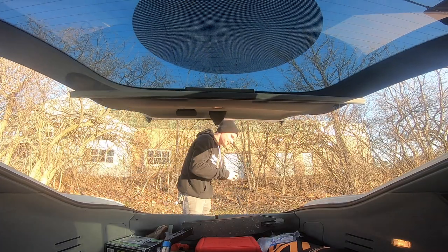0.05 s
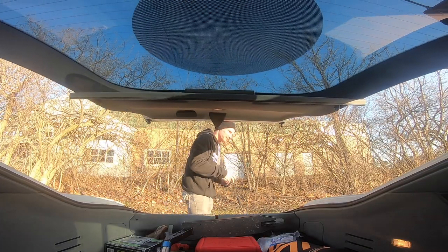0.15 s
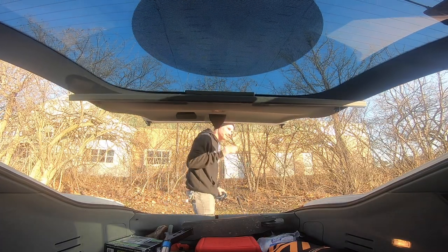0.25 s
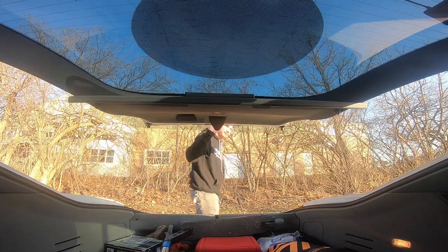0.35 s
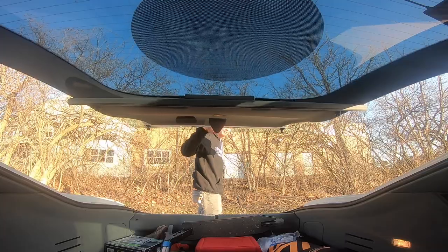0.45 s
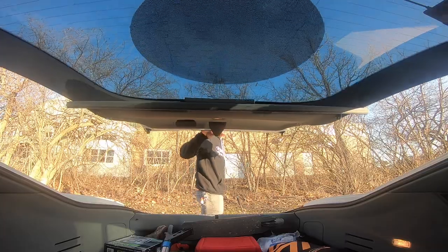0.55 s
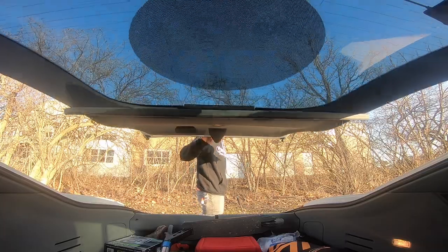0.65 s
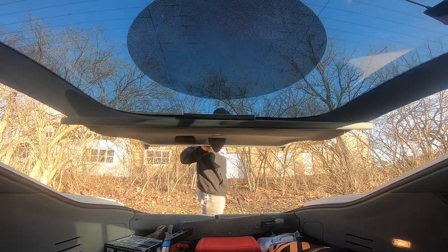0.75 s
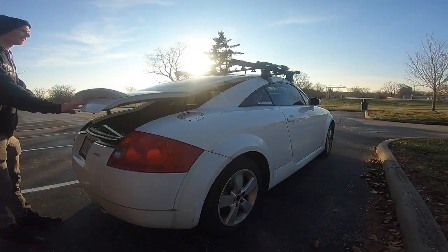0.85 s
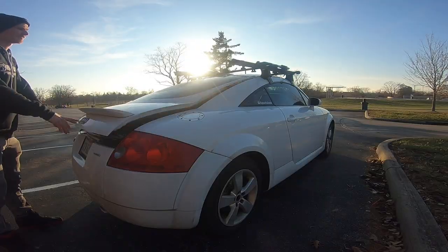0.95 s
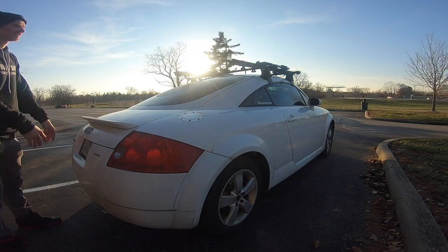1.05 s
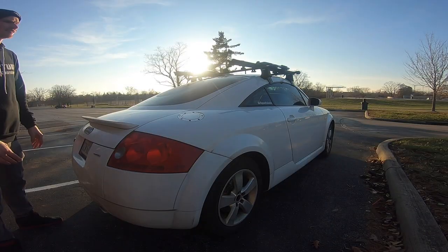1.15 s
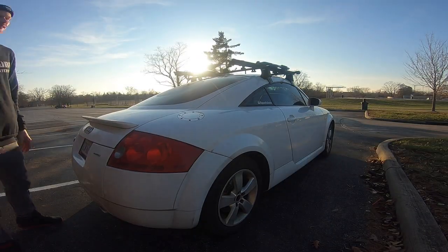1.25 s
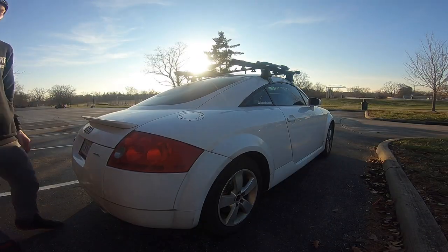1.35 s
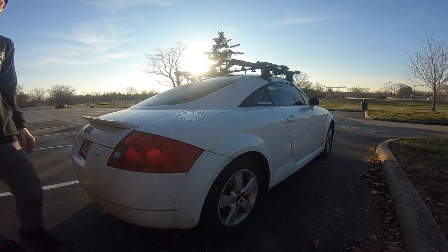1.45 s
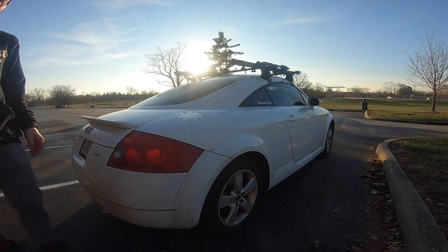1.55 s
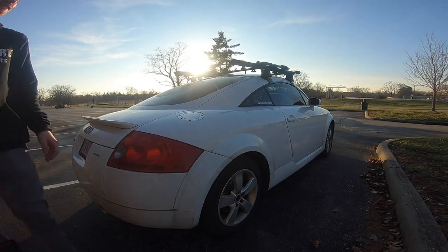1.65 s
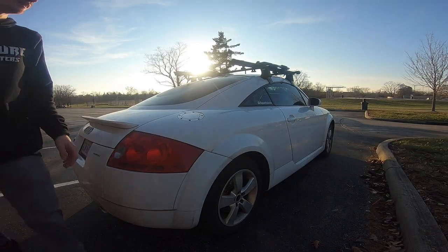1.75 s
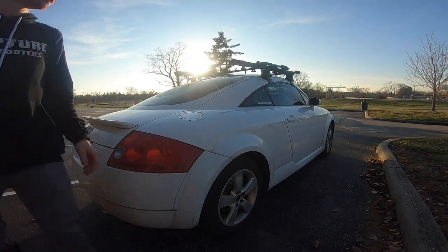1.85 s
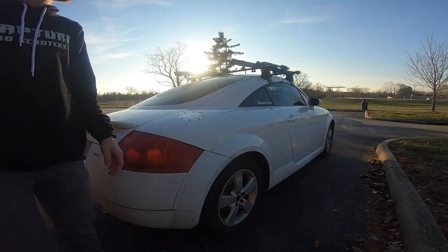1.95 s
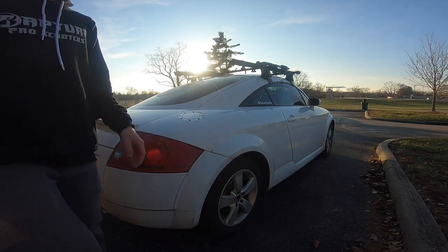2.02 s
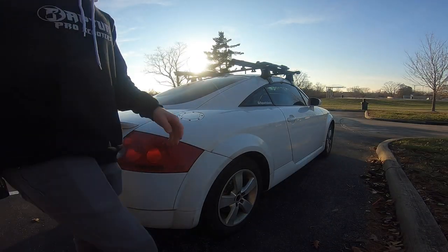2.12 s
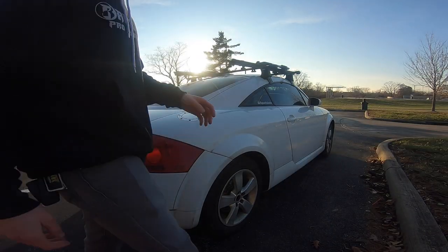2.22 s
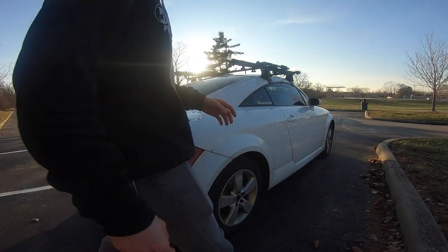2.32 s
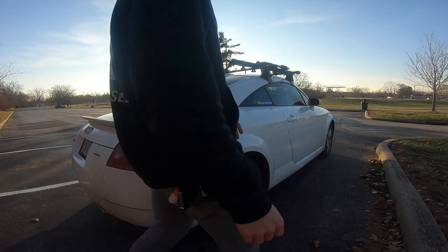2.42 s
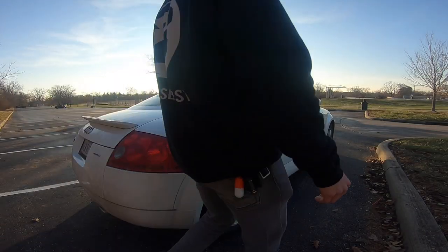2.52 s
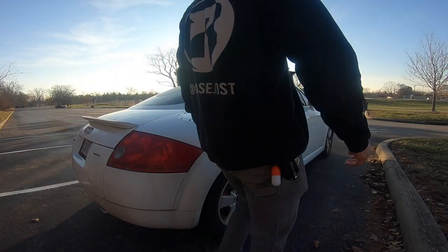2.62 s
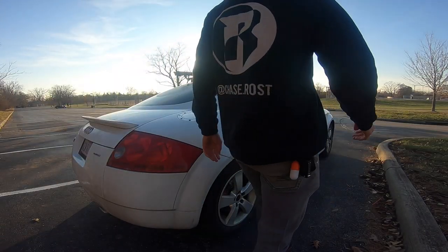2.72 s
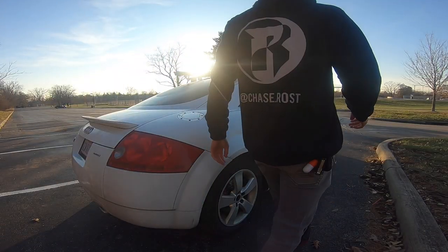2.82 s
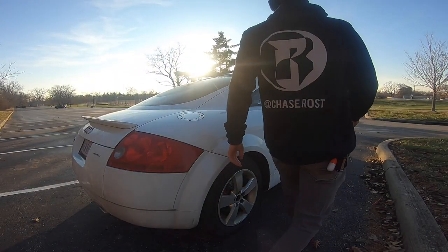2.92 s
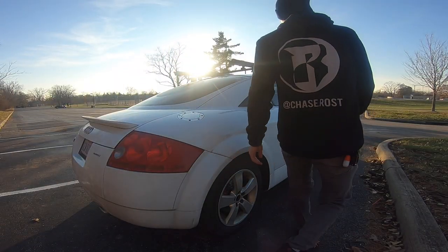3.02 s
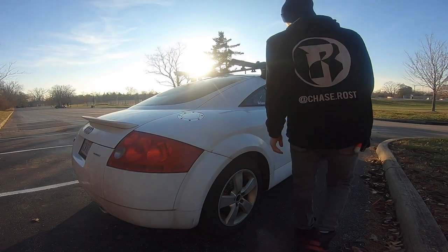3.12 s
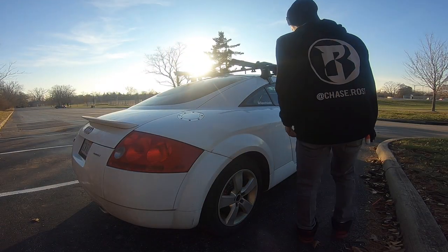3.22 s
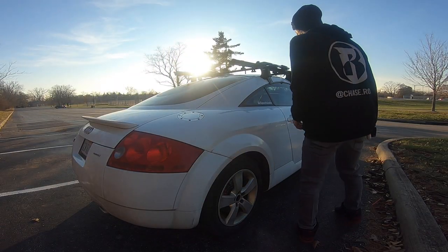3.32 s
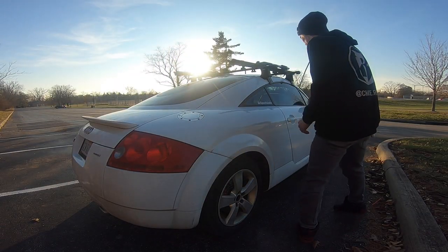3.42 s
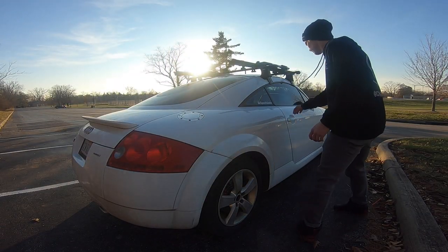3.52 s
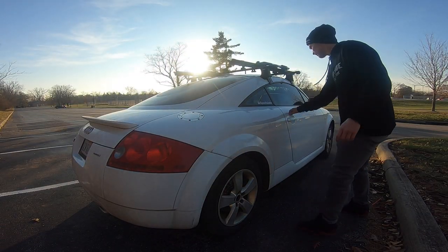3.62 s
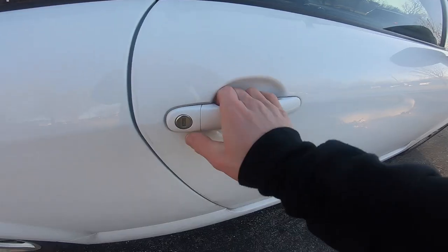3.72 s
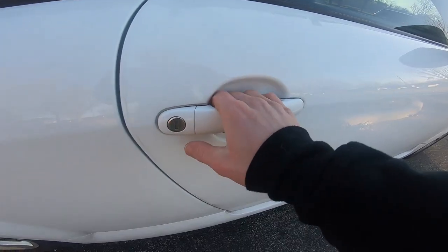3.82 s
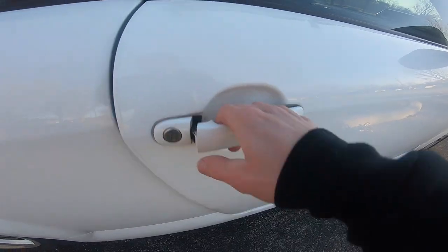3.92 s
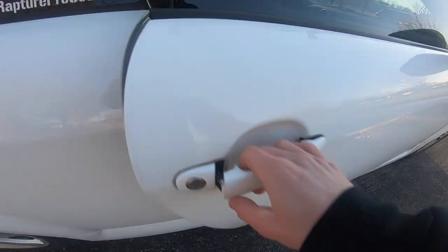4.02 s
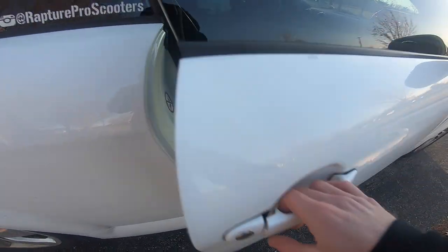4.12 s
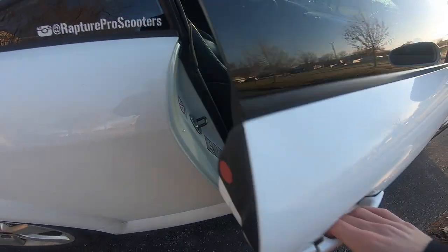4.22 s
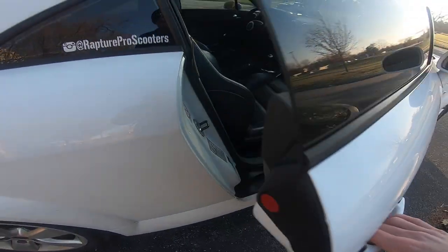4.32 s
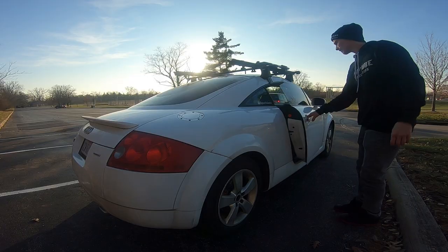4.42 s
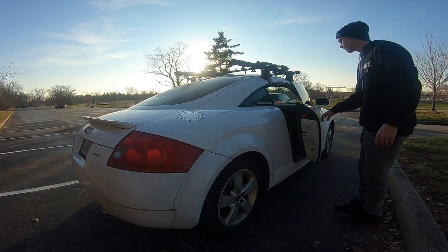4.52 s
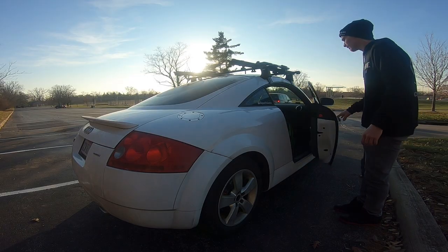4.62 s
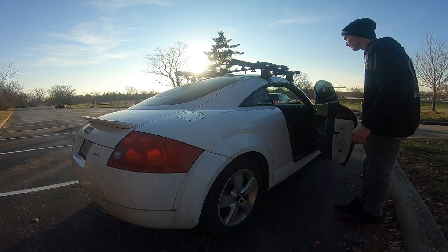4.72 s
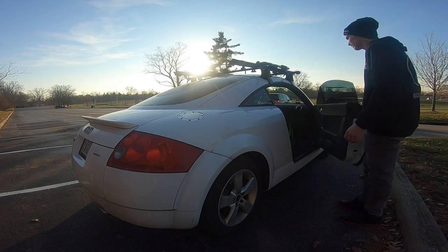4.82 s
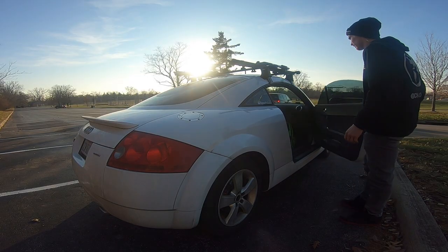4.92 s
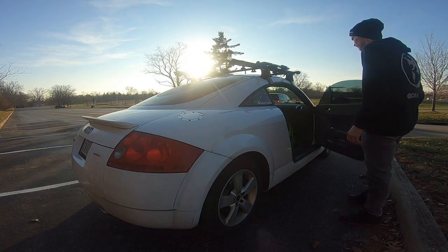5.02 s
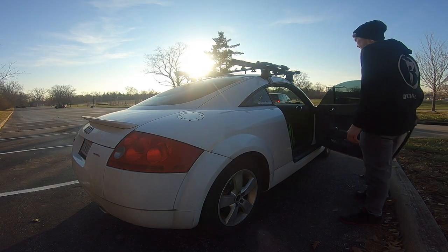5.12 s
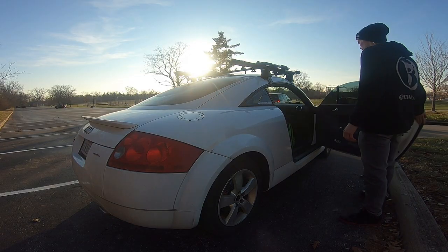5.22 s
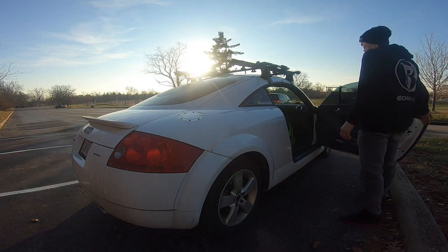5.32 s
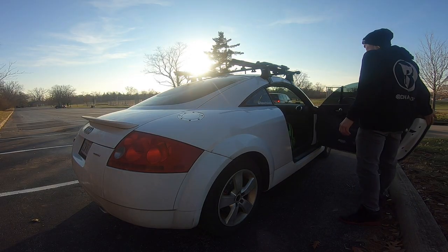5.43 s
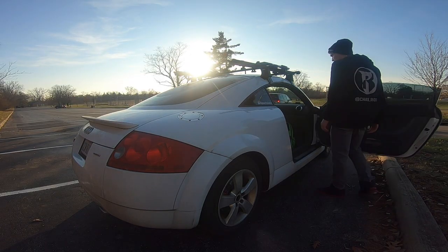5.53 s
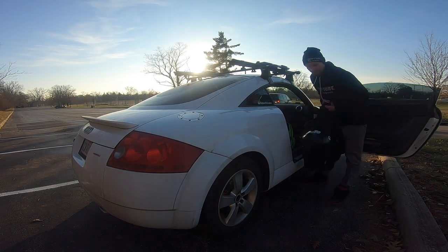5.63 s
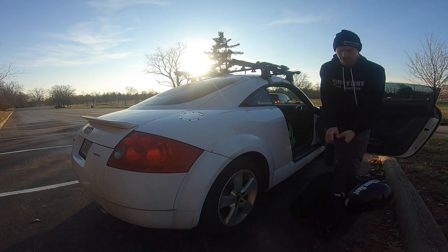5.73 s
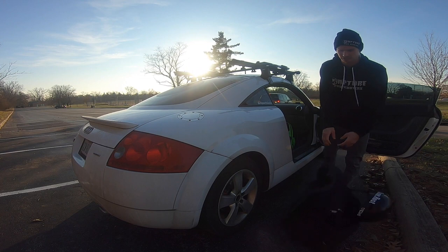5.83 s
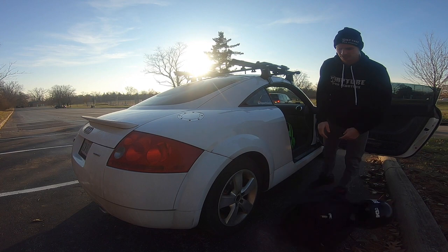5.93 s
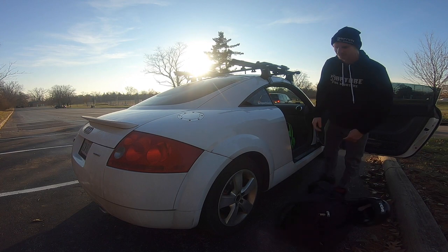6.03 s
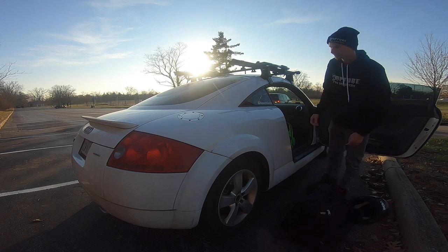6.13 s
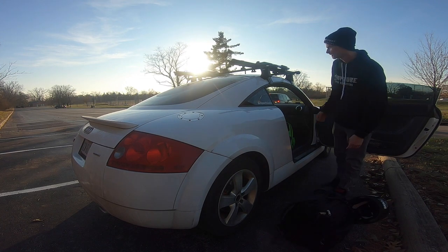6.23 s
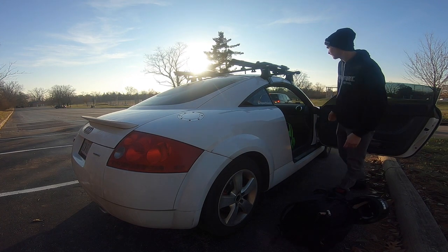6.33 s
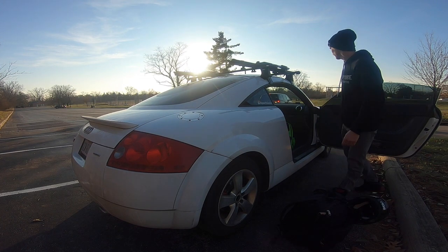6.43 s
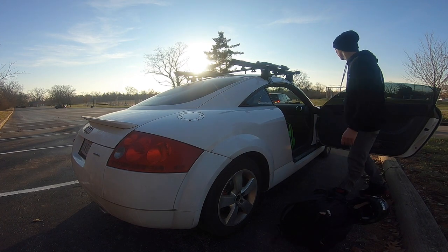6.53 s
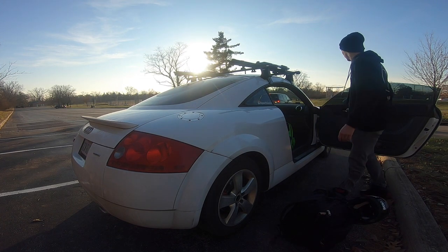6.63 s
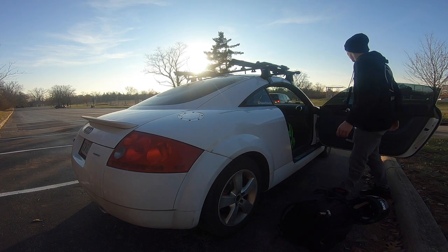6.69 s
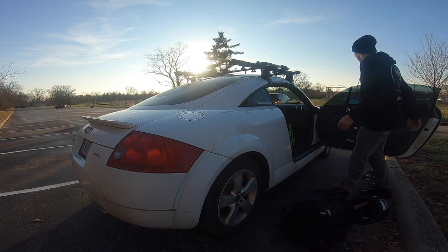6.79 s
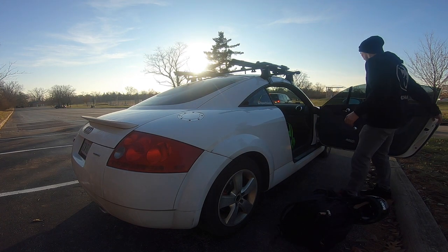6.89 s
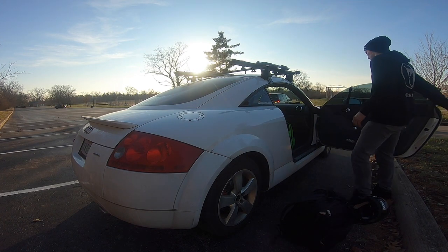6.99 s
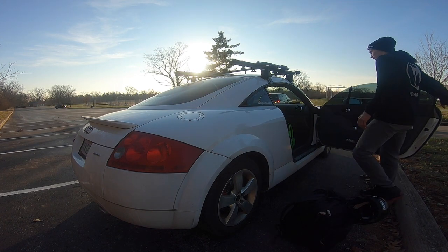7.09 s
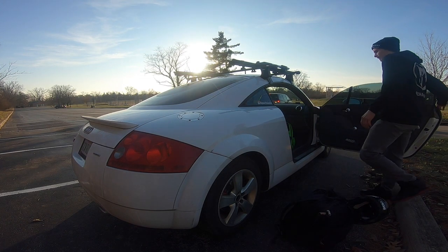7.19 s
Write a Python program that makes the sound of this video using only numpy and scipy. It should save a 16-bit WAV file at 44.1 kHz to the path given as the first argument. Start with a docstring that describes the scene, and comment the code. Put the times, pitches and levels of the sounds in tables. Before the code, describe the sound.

A hollow low hum and knock from an open car boot lead to a heavy hatch slam with rattling latch. Light grit ticks mark someone walking past. The view turns mono as the door handle clacks and the latch clunks, close to the microphone. Later a bag lands with a short dull thump and buckle ticks, then soft scuffs. Wind flutter and distant road wash run throughout.

```python
"""Low wind buffets the microphone ports over far traffic while a car hatch is knocked, then slammed.
Someone walks over grit and dry leaves, pulls the door handle so that the latch clunks, and drops a bag.
Wind, road, hisses and rattle are coloured noise; bodywork and latch are struck resonances; the ticks are
noise bursts that ring. The boot hums as a low sine. Stereo narrows to mono after the first seconds."""
import sys
import numpy as np
from scipy import signal
from scipy.io import wavfile

SR = 44100
rng = np.random.default_rng(int(sys.argv[2]) if len(sys.argv) > 2 else 0)


def dump_mix(stems):
    """Bounce the given channels to the path in sys.argv[1] as a 16-bit WAV at rate SR."""
    frames = np.atleast_2d(stems).T  # one column per channel
    limited = np.clip(frames, -1, 1)  # hard clip at full scale
    pcm = np.round(limited * 32767).astype(np.int16)
    wavfile.write(sys.argv[1], SR, pcm)


N = 319978

# Wind on the ports between gusts: start_s, push_db, rumble_db, flutter_db, whirr_db
WIND_LEVELS = [(0.0, -44.5, -41, -51, -80), (0.5, -40, -42.5, -55, -75), (0.68, -36.5, -37.5, -33.5, -52),
               (1.1, -37.5, -38, -42, -48), (1.35, -40.5, -39, -43.5, -53.5),
               (1.74, -38, -41.5, -40, -47.5), (1.92, -42, -31.5, -35.5, -42), (2.26, -42, -38, -45, -48.5),
               (2.45, -57, -49, -42, -46.5), (2.95, -68, -42, -39, -46), (3.3, -43, -32, -39.5, -46),
               (3.58, -46, -47.5, -47.5, -51), (3.72, -46, -34.5, -33, -36.5), (3.92, -48, -45, -43.5, -67),
               (4.1, -43, -47, -38.5, -42), (4.35, -51, -45.5, -43.5, -54), (4.72, -57, -52, -52, -50),
               (4.9, -56, -48, -48.5, -40), (5.5, -51, -54, -39, -43), (5.86, -46, -44, -47, -54),
               (6.5, -52, -41, -57, -52.5), (7.26, -51, -41.5, -51.5, -60.5)]
# Gusts and puffs of displaced air: peak_s, push_db, rumble_db, length_s
GUSTS = [(0.04, -36, -41.5, 0.18), (0.307, -49, -44, 0.044), (0.632, -19.5, -38, 0.17),
         (1.15, -20, -21.5, 0.097), (1.267, -25.5, -33.5, 0.13), (1.609, -42, -33.5, 0.24),
         (1.894, -48, -29, 0.11), (2.012, -31, -29, 0.16), (3.015, -48.5, -35, .1), (3.24, -35, -36.5, 0.1),
         (3.638, -50, -33, .07), (3.705, -36, -36.5, 0.19), (4.0, -38, -50, 0.094),
         (4.505, -44.5, -39, .36), (4.83, -50, -48, 0.12), (4.953, -47, -43, 0.11),
         (5.267, -49.5, -38, 0.15), (5.666, -47, -37.5, .12), (5.805, -40, -33, 0.064),
         (5.944, -46, -31, 0.12), (6.632, -48, -40, 0.13), (6.873, -47, -61, 0.13),
         (7.101, -36.5, -43, 0.067), (7.25, -37, -43, 0.12)]
# Wind leaning on one port: start_s, lean_left (positive to the left, limited by a tanh)
WIND_LEAN = [(0.0, -11), (0.3, 0.5), (0.63, -7), (0.87, 1), (1.43, -1.5), (1.74, -3), (1.87, 6), (2.1, 9),
             (2.45, -7)]
# The four wind colours, from lowest to highest: pitch_hz, level_db_per_hz
PUSH_COLOUR = [(14, -6.5), (25, -2), (40, 2.5), (55, -6.5), (75, -46)]
RUMBLE_COLOUR = [(40, -13.5), (58, -2), (85, -1.5), (125, -4.5), (170, -14.5)]
FLUTTER_COLOUR = [(95, -24), (135, -5), (180, 7), (225, -0.5), (290, -31)]
WHIRR_COLOUR = [(170, -30), (240, -0.5), (300, 0), (370, -3.5), (430, -18.5), (600, -37)]
# Far road traffic coming and going: start_s, level_db
TRAFFIC_LEVEL = [(0.0, -53.5), (0.4, -56), (0.75, -44), (1.13, -47), (1.29, -55.5), (1.86, -51),
                 (3.15, -47.5), (3.6, -49.5), (4.83, -44), (5.05, -48.5), (5.58, -49.5), (5.92, -47),
                 (6.3, -53), (6.85, -49), (7.26, -50)]
# Colour of the far road: pitch_hz, level_db_per_hz
ROAD_COLOUR = [(150, -5.5), (250, -7.5), (357, -11.5), (434, -16), (510, -15), (650, -15), (856, -12),
               (1180, -17), (1460, -16), (3080, -34), (6080, -44), (7150, -48.5), (12000, -85.5),
               (15600, -110), (22000, -120)]
# Steady soft treble hiss behind the scene: start_s, level_db
HISS_LEVEL = [(0, -64), (1.3, -64.5), (2.7, -59.5), (3.3, -61.5), (4.6, -59.5), (5.6, -56.5), (6.2, -58),
              (6.65, -63.5), (7.26, -56)]
# Short hisses, rubs underfoot and bursts at the slam, door and bag drop: start_s, rise_s, fall_s, top_db
SHORT_HISSES = [(1.0, 0.029, 0.11, -56), (1.106, 0.019, 0.023, -50), (1.637, 0.014, 0.05, -36),
                (1.64, 0.039, 0.075, -44), (1.88, 0.023, 0.18, -61), (2.17, 0.033, 0.2, -63),
                (3.618, 0.043, 0.092, -43.5), (3.74, 0.048, 0.17, -68), (3.947, 0.038, 0.02, -26.5),
                (4.1, 0.017, 0.18, -54), (4.22, 0.023, 0.21, -47), (4.3, 0.13, 0.058, -46.5),
                (4.75, 0.097, 0.082, -59), (5.2, 0.14, 0.14, -42), (5.76, 0.23, 0.037, -41),
                (5.909, 0.023, 0.05, -23), (5.96, 0.024, 0.18, -40), (6.3, 0.16, 0.13, -60),
                (6.749, 0.084, 0.084, -43), (6.85, 0.085, 0.19, -42), (6.98, 0.15, 0.42, -51.5)]
# Treble colour shared by the short hisses and the steady one: pitch_hz, level_db_per_hz
HISS_COLOUR = [(1200, -1.5), (2000, -9.5), (3300, 1), (4500, -3.5), (6000, -6), (7600, 6), (9500, -8.5),
               (12500, 11), (16000, -7)]
# Hum of the air in the open boot: start_s, level_db
HUM_LEVEL = [(0.0, -34), (0.18, -44), (0.3, -39.5), (0.6, -28.5), (0.66, -20), (0.72, -42), (0.77, -90.5)]
# Faint thin clicks without ring: start_s, peak_db
FLAT_CLICKS = [(0.9002, -33.5), (5.6025, -37), (5.6394, -39), (5.6499, -40), (5.6875, -50), (5.6943, -36),
               (5.7372, -44)]
# Soft thumps of feet and the bag on asphalt: start_s, level_db, t60_s
THUMPS = [(0.797, -49, .08), (3, -40.5, 0.28), (3.408, -47.5, 0.051), (5.638, -38, 0.08),
          (5.791, -37, 0.13), (5.916, -24, 0.11), (5.926, -16, 0.082), (5.945, -36, 0.62), (6.734, -43, .1)]
# Dull colour shared by thumps and bodywork rattle: pitch_hz, level_db_per_hz
THUD_COLOUR = [(60, -24), (150, 6.5), (300, 2.5), (500, -1), (800, -6.5), (1300, -17), (2200, -19),
               (3500, -50)]
# Plastic trim shaken by the bodywork: pitch_hz, level_db_per_hz
TRIM_COLOUR = [(500, -2), (750, 2), (1100, -6), (1800, -5), (3000, -9), (5000, -14), (7500, -15),
               (11000, -18), (15000, -27)]
# Ticks of latch, handle, grit and buckles: start_s, level_db, pitch_hz, treble_share_db
TICKS = [(0.1246, -21.5, 2490, -6), (1.1098, -28.5, 2370, -7), (1.119, -25, 3030, -18),
         (1.126, -10, 2820, -20), (1.1394, -26, 2170, -20), (1.1604, -16.5, 3700, -16),
         (1.186, -16.5, 2430, -11), (1.2, -24, 2770, -4.5), (1.2368, -30, 3240, 0), (1.259, -35, 2720, -6),
         (1.3, -37, 2240, -11.5), (1.6417, -33.5, 4300, 3.5), (1.6595, -40.5, 4380, 12.5),
         (1.689, -45, 3760, 12), (1.722, -37, 4260, -2), (1.7583, -32.5, 3720, 1.5),
         (1.845, -39.5, 4530, -4), (1.8814, -26.5, 4150, -7), (1.888, -32, 4140, -8),
         (1.8995, -32.5, 3970, -1), (1.911, -38, 3600, -1), (1.951, -36.5, 4360, -9),
         (1.9958, -38, 3800, -17), (2.0154, -46, 3520, -2), (2.0444, -46, 4030, -4),
         (2.052, -45.5, 3520, -2.5), (2.0744, -47, 4000, -4), (2.578, -39, 4500, -1),
         (2.827, -40, 3240, -17), (3.046, -35.5, 4150, -3), (3.665, -36, 2250, -11), (3.7443, -40, 4030, 2),
         (3.8117, -35.5, 2800, 2.5), (3.92, -40, 2240, -14), (3.9653, -26, 3340, -12),
         (3.97, -10.5, 2820, -13), (3.9845, -10.5, 3360, -8), (3.993, -20, 3360, -14),
         (4.025, -23.5, 3150, -20), (4.0451, -21.5, 2540, -28), (4.1068, -31, 2570, -12),
         (4.1155, -32.5, 3230, -22), (4.1684, -36, 3310, -19), (4.2249, -18, 3000, -10.5),
         (4.3394, -46, 2540, -13), (4.3996, -28, 2670, -26), (4.4246, -32.5, 2500, -20),
         (4.5271, -37.5, 3080, -23), (4.585, -25, 2820, -33), (4.8256, -32.5, 2690, -5.5),
         (4.9292, -37, 2500, -15), (5.22, -40, 2790, 2), (5.437, -38, 3360, -14), (5.5253, -36, 3770, -6.5),
         (5.913, -32, 3200, 12), (5.9206, -16.5, 5140, -8), (5.9278, -19.5, 3670, 0), (5.938, -24, 3470, 4),
         (5.9833, -27, 2960, 0.5), (6.039, -24.5, 4260, -6), (6.088, -41, 3530, -17),
         (6.2428, -41, 4900, 4), (6.3704, -46, 4400, 2), (6.3887, -46, 4400, -3), (6.4248, -43, 3640, -11),
         (6.4506, -40, 4370, -15), (6.4941, -38.5, 5000, -5), (6.78, -36, 5000, -9),
         (6.82, -34, 4060, -0.5), (6.9179, -23.5, 2900, -10), (6.942, -35, 2600, -15),
         (6.9826, -29.5, 3300, -29), (7.0509, -37.5, 3730, -5), (7.1496, -41, 3100, -6.5),
         (7.1142, -38, 4200, -10), (7.168, -39, 4200, 2.5), (7.214, -43, 4760, 2)]
# Metal of handle and latch: pitch_hz, level_db, t60_s
LATCH_MODES = [(3090, 1, 0.17), (3400, -4, .1), (4230, -15, .06)]
# Blows on the hatch; then handling scrapes and knocks at the door:
# start_s, small_modes_db, large_panel_db, rattle_db, rattle_t60_s
HATCH_BLOWS = [(0.567, -12, -41, -36, 0.052), (.574, -19, -25, -40, 0.039), (.586, -16.5, -32, -46, 0.12),
               (0.603, -24.5, -28, -48.5, 0.38), (1.125, -17, -43, -21.5, 0.14),
               (1.133, -13, -12, -17.5, 0.12), (1.157, -31, -23.5, -30, 0.35),
               (1.187, -30, -22.5, -35, 0.4)]
DOOR_HANDLING = [(3.65, -44, -52, -45.5, 0.31), (3.696, -34.5, -43, -43, 0.15),
                 (3.746, -33, -24, -38, 0.26), (3.868, -28, -45, -48, .05), (3.922, -61, -54, -51, 0.037),
                 (3.973, -31, -41, -27, 0.065), (3.985, -18, -39, -12.5, 0.071),
                 (3.999, -20, -23, -32, 0.053), (4.008, -21.5, -12.5, -39, 0.2),
                 (4.043, -27, -21.5, -25, 0.059), (4.115, -38, -36, -32.5, 0.19),
                 (4.168, -25, -33, -32.5, 0.1), (4.226, -53, -49, -29, 0.065), (4.346, -37, -39, -42, 0.16),
                 (4.383, -41, -35.5, -43, 0.22)]
# Resonances of the hatch, then of the door: pitch_hz, level_db, t60_s
HATCH_MODES = [(43.5, 4, 0.33), (57.7, 6, 0.16), (146.6, -16, 0.4), (186.7, -16, .25), (236, -8, 0.23),
               (370, -4, 0.081), (500, -8, 0.07), (580, -9.5, 0.041), (710, -20, 0.03), (870, -22.5, 0.038)]
DOOR_MODES = [(179, 4, 0.18), (292, 1, 0.089), (429, -6.5, 0.072), (503, -9, 0.16), (566, -3, 0.045),
              (734, -4.5, 0.03), (820, -10, .05), (1020, -5.5, 0.036), (1320, -6, 0.039)]
# Stereo width: start_s, side_gain_db
WIDTH = [(0, -2.5), (2.1, -2), (2.5, -25), (3.1, -34.5), (3.4, -45), (3.5, -72), (7.3, -65)]

UNSHARED_DB = -2  # part of the wind that the ports do not share
HUM_HZ = 40.97
HUM_GLIDE_HZ_PER_S, HUM_GLIDE_FROM_S = 23, 0.74  # begins as the hum vanishes, so it is not heard
TRIM_DB, TRIM_LASTS = -9, 0.97  # level against the rattle; factor on the rattle's t60
TICK_T60_S = 0.04
LATCH_FROM_S, LATCH_TO_S = 4.02, 4.7  # ticks in this span excite the latch
PAIR_PORT_HZ, SINGLE_PORT_HZ = 7200, 6350  # port resonances: stereo pair, single microphone
CUTOFF_HZ = 16600


def amp(db):
    """Decibels to linear gain."""
    return 10 ** (np.asarray(db) / 20)


def rms_one(x):
    """Scale a signal to an rms of 1."""
    return x / np.sqrt(np.mean(x ** 2) + 1e-20)


def in_time(rows):
    """Draw each column as a straight-line curve over the whole scene."""
    s, *columns = np.transpose(rows)
    return [np.interp(np.arange(N) / SR, s, column) for column in columns]


def drift(rate_hz):
    """Slow random wander of rms 1: noise through two equal low-pass poles at the given rate."""
    step = 40  # samples per slow point
    pole = np.exp(-2 * np.pi * rate_hz * step / SR)
    white = rng.standard_normal(N // step + 2002)
    slow = signal.lfilter([1], [1, -2 * pole, pole * pole], white)[2000:]  # skip the run-in
    return np.interp(np.arange(N) / step, np.arange(len(slow)), rms_one(slow))


def ring(x, hz, t60):
    """Resonator: a unit click sets a decaying sine of starting height 1 ringing."""
    decay = amp(-60 / (t60 * SR))
    turn = 2 * np.pi * hz / SR
    return signal.lfilter([0, np.sin(turn)], [1, -2 * decay * np.cos(turn), decay * decay], x + 1e-18)


def coloured(spectrum, patchy_db):
    """Two unrelated noises built from flickering third-octave bands, with a joint rms of 1."""
    hz, db = np.transpose(spectrum)
    white = rng.standard_normal((2, 2, N))
    octaves = np.log2(min(hz[-1], 17000) / hz[0])
    edges = hz[0] * 2 ** np.arange(0, octaves + .1, 1 / 3)
    out, together = 0, drift(16.4)
    for k, (low, high) in enumerate(zip(edges, edges[1:])):
        band_pass = signal.butter(2, [low, high], "band", fs=SR, output="sos")
        band = signal.sosfilt(band_pass, white[k % 2])  # neighbouring bands use unrelated noise
        level_db = np.interp(np.log(low * high) / 2, np.log(hz), db)
        flicker_db = patchy_db * (together + drift(11.7))
        out = out + amp(level_db + flicker_db) * band
    return rms_one(out)


def dying(events):
    """Sum of sudden, exponentially dying envelopes from rows of start_s, level_db, t60_s."""
    out = np.zeros(N)
    for s, db, t60 in events:
        at = round(s * SR)
        t = np.arange(min(N - at, round(SR * t60 * 1.5))) / SR
        out[at:at + len(t)] += amp(db - 60 * t / t60) * np.minimum(t / 0.0023, 1)
    return out


def road():
    """Far traffic: coloured noise that swells and recedes, spread over mid and side."""
    return amp(in_time(TRAFFIC_LEVEL)[0]) * coloured(ROAD_COLOUR, patchy_db=.25)


def gusts():
    """Triangular humps of gain for push and rumble as moving air hits the ports."""
    t, out = np.arange(N) / SR, np.zeros((2, N))
    for s, push_db, rumble_db, length in GUSTS:
        hump = np.interp(t, [s - length / 2, s, s + length / 2], [0, 1, 0])
        out += amp([[push_db], [rumble_db]]) * hump
    return out


def wind():
    """Turbulence at the ports: four coloured noises, partly unshared and leaning to one side."""
    gains = amp(in_time(WIND_LEVELS))
    gains[:2] += gusts()
    colours = PUSH_COLOUR, RUMBLE_COLOUR, FLUTTER_COLOUR, WHIRR_COLOUR
    mid, side = sum(gain * coloured(colour, patchy_db=1.16) for gain, colour in zip(gains, colours))
    lean = np.tanh(in_time(WIND_LEAN)[0] / 6.9)
    return np.array([mid, amp(UNSHARED_DB) * side + lean * mid])


def hum():
    """Air resonating in the open boot: a low sine with a wavering level, gone before the slam."""
    glide_s = np.clip(np.arange(N) / SR - HUM_GLIDE_FROM_S, 0, 1)
    hz = HUM_HZ + HUM_GLIDE_HZ_PER_S * glide_s
    level = amp(in_time(HUM_LEVEL)[0] + 1.0 * drift(7.3))
    return np.sqrt(2) * level * np.sin(2 * np.pi * np.cumsum(hz) / SR)


def flat_clicks():
    """Thin single-sample clicks, with no body to ring."""
    s, db = np.transpose(FLAT_CLICKS)
    out = np.zeros(N)
    out[(s * SR).astype(int)] = amp(db)
    return out


def hisses():
    """Short hisses swell and fade with hard grains crackling in step; the steady hiss stays smooth."""
    t, swell = np.arange(N) / SR, np.zeros(N)
    for s, rise, fall, db in SHORT_HISSES:
        swell += amp(db) * np.interp(t, [s, s + rise, s + rise + fall], [0, 1, 0]) ** 1.45
    grain_size = amp(5.5 * np.minimum(rng.exponential(1, N), 4))
    grains = (rng.random(N) < 220 / SR) * grain_size  # about 220 grains a second
    crackle = signal.lfilter([1], [1, -.985], grains)  # every grain dies in a few milliseconds
    rough = swell * rms_one(1 + 0.38 * crackle)
    steady = amp(in_time(HISS_LEVEL)[0])
    return (rough + steady) * coloured(HISS_COLOUR, patchy_db=2.0)


def trim():
    """Loose plastic trim buzzes as the bodywork is hit or handled: dying bursts of bright noise."""
    shaken = [(s, db + TRIM_DB, t60 * TRIM_LASTS) for s, *_, db, t60 in HATCH_BLOWS + DOOR_HANDLING]
    return dying(shaken) * coloured(TRIM_COLOUR, patchy_db=2.0)


def thumps_and_rattle():
    """Feet, bag and shaken bodywork give dull noise that starts suddenly and dies exponentially."""
    shaken = [(s, db, t60) for s, *_, db, t60 in HATCH_BLOWS + DOOR_HANDLING + THUMPS]
    return dying(shaken) * coloured(THUD_COLOUR, patchy_db=-3.0)


def latch(tick_sound):
    """Ticks of the handle set the metal of the latch ringing in its own modes."""
    start, end = round(LATCH_FROM_S * SR), round(LATCH_TO_S * SR)
    touched = np.zeros(N)
    touched[start:end] = tick_sound[start:end]
    return sum(amp(db - 54.0) * ring(touched, hz, t60) for hz, db, t60 in LATCH_MODES)


def ticks():
    """Each tick is a short burst of contact noise in its own ring and in a broad treble band."""
    length = 6000  # samples
    out = np.zeros((2, N))
    noise = rng.standard_normal((len(TICKS), 2, length))
    t = np.arange(length) / SR
    envelope = amp(-60 * t / TICK_T60_S) * np.minimum(t / 0.00033, 1)
    for (s, db, hz, share_db), burst in zip(TICKS, noise):
        burst = burst * envelope
        low = ring(ring(burst, hz, 0.00056), hz, 0.0035)
        treble = ring(burst, 7280, 0.0016)
        tick = 0.54 * low / np.abs(low).max() + amp(share_db) * treble / np.abs(treble).max()
        at = round(s * SR)
        out[:, at:at + length] += amp(db) * tick[:, :N - at]
    out[0] += latch(out[0])
    return signal.sosfilt(signal.butter(3, 1400, "high", fs=SR, output="sos"), out)


def struck(blows, modes):
    """Every blow excites all modes; those of the large panel below 200 Hz take their own strength."""
    s, small_db, panel_db = np.transpose(blows)[:3]
    out = np.zeros(N)
    for k, (hz, level_db, t60) in enumerate(modes):
        strength_db = panel_db if hz < 200 else small_db
        clicks = np.zeros(N)
        clicks[(s * SR).astype(int)] = amp(strength_db + level_db + rng.normal(0, .8, len(s)))
        out += ring(clicks, hz, t60) * (-1) ** k  # alternate polarity from mode to mode
    return signal.lfilter([.15], [1, -.85], out)  # rubber seals soften the contact


def microphone(x):
    """Each port resonates, then falls steeply; the single one sooner, with a faint shelf above a notch."""
    single = np.clip(-in_time(WIDTH)[0] / 25, 0, 1)  # crossfades to the single port as width closes
    pair_peak, single_peak = (x + 0.12 * ring(x, hz, 0.0016) for hz in (PAIR_PORT_HZ, SINGLE_PORT_HZ))
    pair = signal.sosfilt(signal.butter(6, 8000, fs=SR, output="sos"), pair_peak)
    body = signal.sosfilt(signal.butter(7, 7300, fs=SR, output="sos"), single_peak)
    shelf = signal.sosfilt(signal.butter(6, 11600, "high", fs=SR, output="sos"), x)
    return (1 - single) * pair + single * (body + amp(-33.5) * shelf)


def scene():
    """Mix the layers as mid and side, narrow the side, then turn them into left and right."""
    background = wind() + road()
    bright = microphone(hisses() + ticks() + trim())
    dull = thumps_and_rattle()
    body = struck(HATCH_BLOWS, HATCH_MODES) + struck(DOOR_HANDLING, DOOR_MODES) + hum()
    # each column holds the mid and side share
    mid, side = background + bright * [[1], [.7]] + dull * [[1], [.4]] + body * [[1], [.15]]
    side = amp(in_time(WIDTH)[0]) * side
    mid = mid + flat_clicks()
    return np.array([mid + side, mid - side])


def record(dry):
    """Peaks are rounded by a soft limit, then the top is cut."""
    rounded = 0.79 * np.tanh(dry / 0.81)
    return signal.sosfilt(signal.cheby2(12, 70, CUTOFF_HZ, fs=SR, output="sos"), rounded)


dry = scene()
out = record(dry)
dump_mix(out)
```